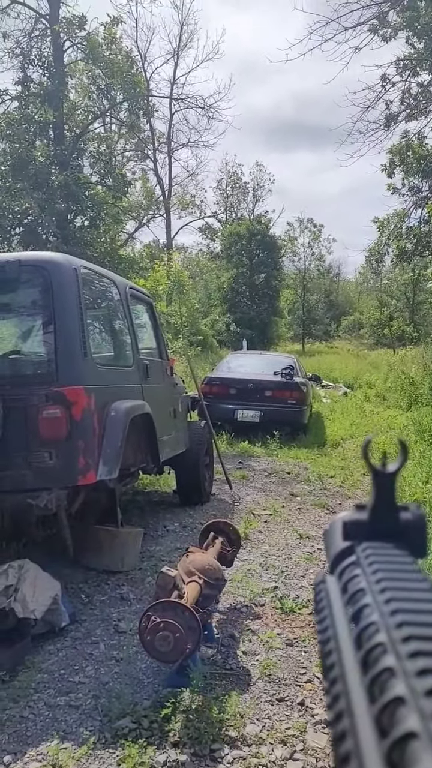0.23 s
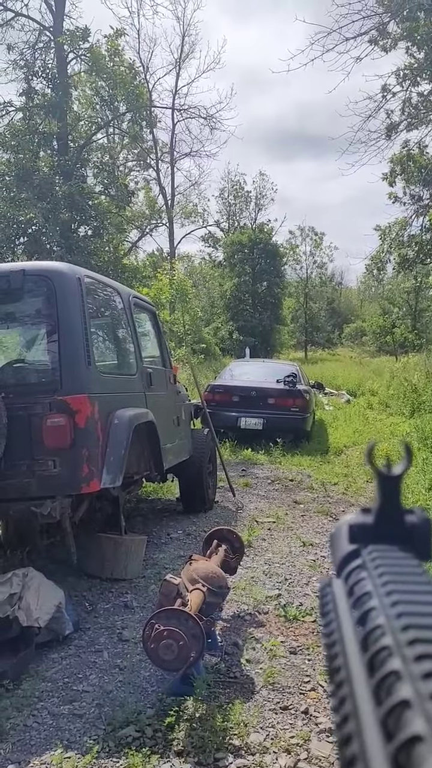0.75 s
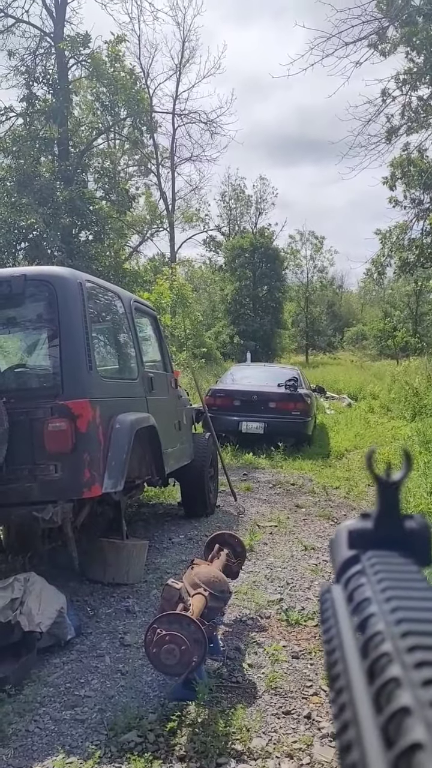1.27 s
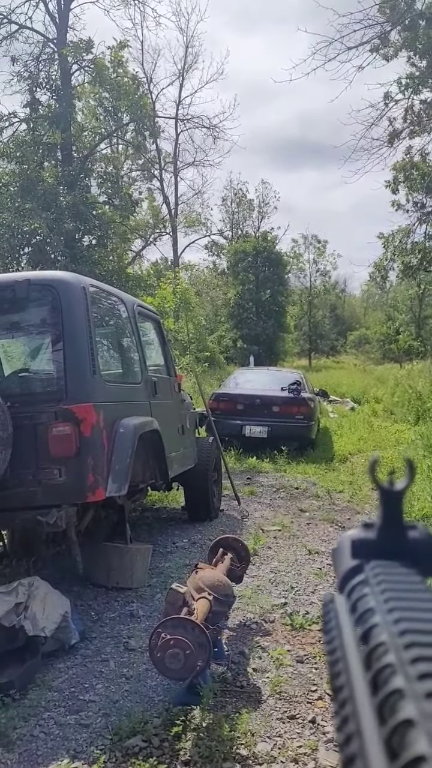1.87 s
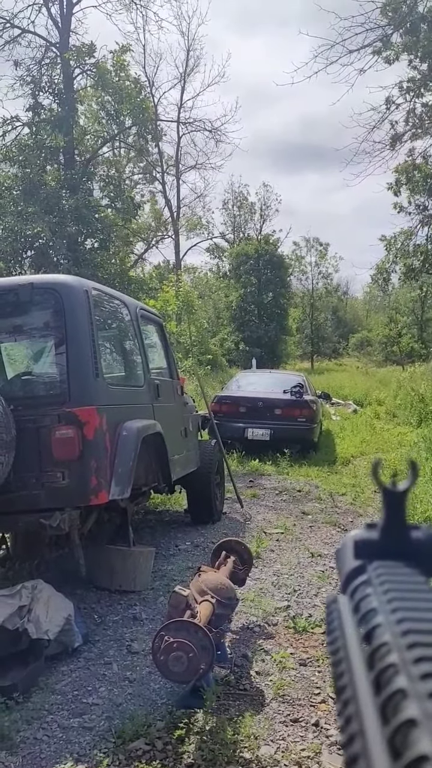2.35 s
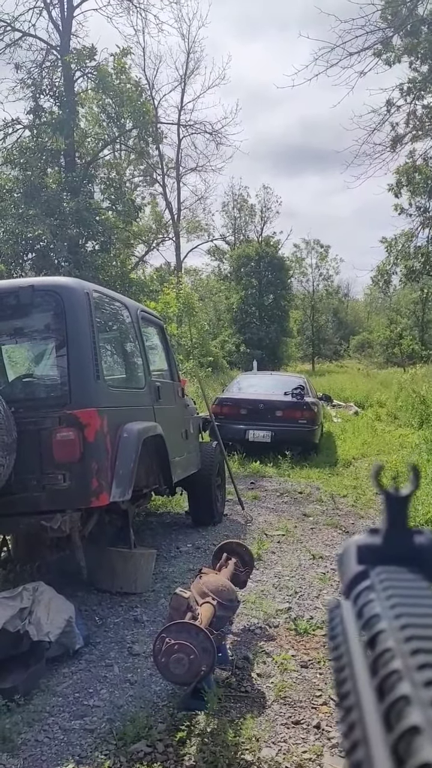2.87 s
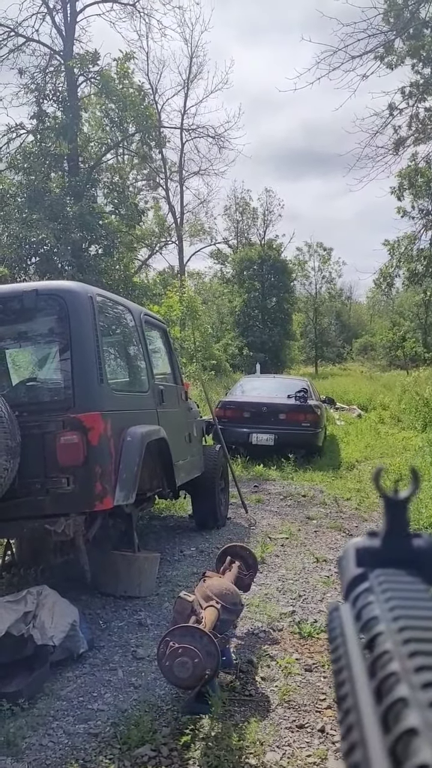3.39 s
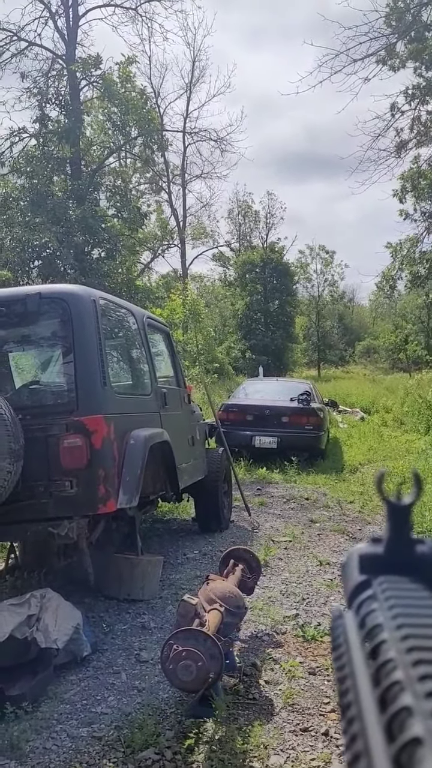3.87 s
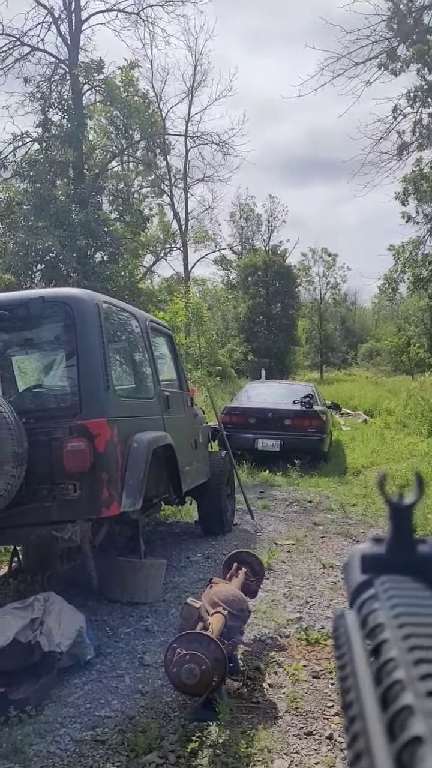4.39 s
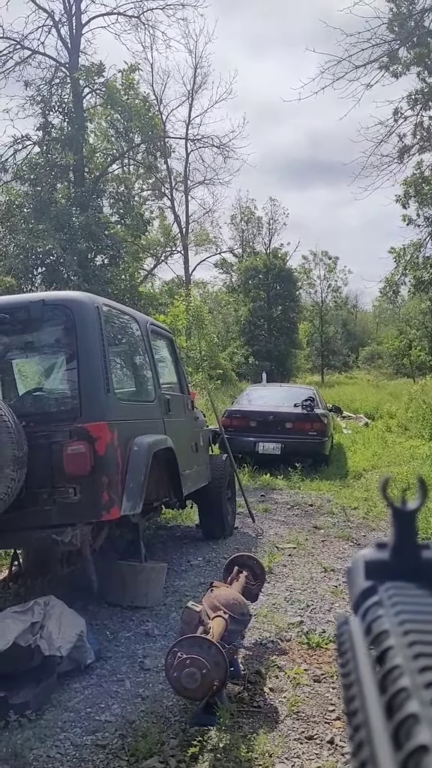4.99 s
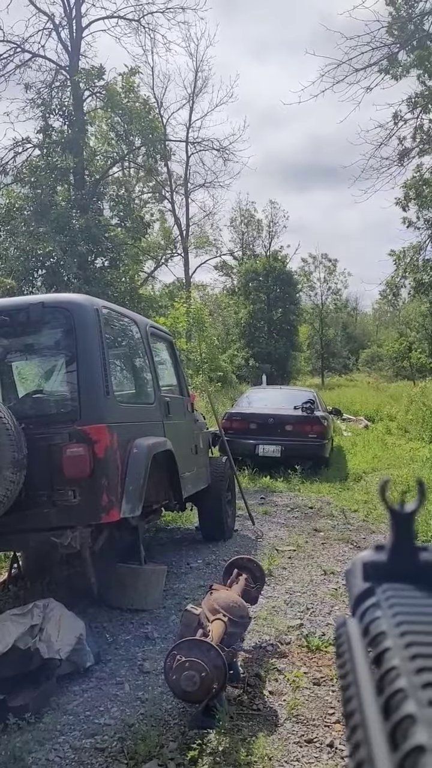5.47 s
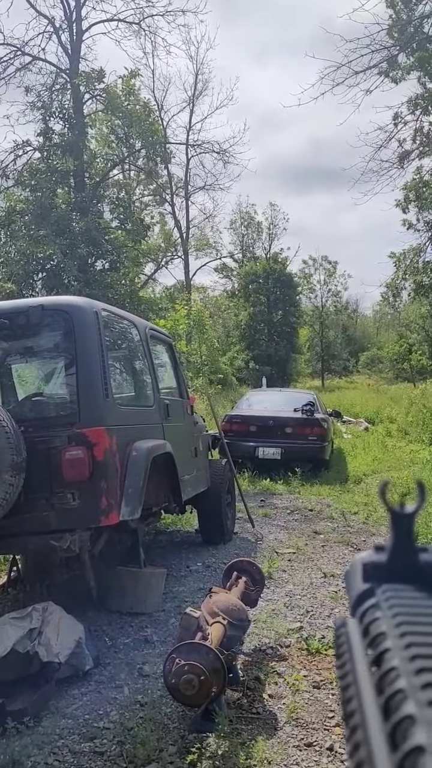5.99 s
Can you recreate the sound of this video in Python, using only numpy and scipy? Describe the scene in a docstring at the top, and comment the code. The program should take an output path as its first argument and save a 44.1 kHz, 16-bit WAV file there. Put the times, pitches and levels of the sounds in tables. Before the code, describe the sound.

An electric airsoft rifle fires single shots, then rapid whirring, rattling bursts close by outdoors, its pellets smacking a distant metal target.

```python
"""An electric airsoft rifle fires bursts in a quiet yard, close in and just right of the microphone.
A motor whines through rattling gears as it cocks the spring; each released piston thumps, pops at the
muzzle and rings the barrel. After some bursts the gears clack back on their latch. Pellets smack a
distant metal target straight ahead and the trees return a thin echo. Underneath lie faint outdoor air
and the low rumble and bumps of a handheld microphone."""
import sys
import numpy as np
from scipy import signal
from scipy.fft import rfft, irfft
from scipy.io import wavfile
from scipy.ndimage import uniform_filter1d

SR = 44100
rng = np.random.default_rng(int(sys.argv[2]) if len(sys.argv) > 2 else 0)


def transcribe(signal):
    """Save signal, clipped to [-1, 1], as a 16-bit WAV file at the path in sys.argv[1]."""
    frames = np.atleast_2d(signal).T
    limited = np.clip(frames, -1, 1)
    pcm = np.round(limited * 32767).astype(np.int16)
    wavfile.write(sys.argv[1], SR, pcm)


N = 275625
TIME = np.arange(N) / SR
PORT_LAG = 15  # samples by which the left microphone port hears the rifle late

# Trigger pulls. Each row: motor on in seconds, top mesh pitch of the first stroke in Hz, motor off and
# standstill in seconds, extra whine on the first stroke in dB, relative gear level in dB.
PULLS = [(.385, 1200, .535, 0.58, 3.5, -23), (1.001, 800, 1.08, 1.155, 0, -24.5),
         (1.159, 950, 1.198, 1.226, 7.5, -24.5), (1.587, 1280, 1.835, 1.88, 6, -23.5),
         (2.508, 1030, 3.165, 3.252, 4, -26), (3.668, 1220, 4.41, 4.443, 6, -29),
         (4.456, 1050, 4.57, 4.64, 5.5, -29), (4.999, 1340, 5.55, 5.605, 6.5, -27),
         (5.556, 1438, 5.715, 5.765, 0.5, -27), (5.797, 1410, 5.962, 6, 4.5, -26.5),
         (6.131, 900, 6.26, 6.35, 0, -27.5)]
# Shots. Each row: time in seconds, relative levels of piston thump and pellet impact in dB.
SHOTS = [(-.112, -26, -29), (.4673, -29.5, -25.5), (1.0389, -24.5, -29), (1.672, -28.5, -27),
         (1.7814, -26, -28), (2.5735, -28, -27), (2.688, -34.5, -32), (2.7994, -33, -31),
         (2.914, -29.5, -38.5), (3.026, -30.5, -30), (3.1341, -32, -29.5), (3.7641, -33.5, -34),
         (3.8833, -37, -32), (3.9983, -33.5, -32), (4.1116, -33, -28.5), (4.2249, -34.5, -29),
         (4.3371, -26.5, -29), (4.5202, -28.5, -27.5), (5.1021, -28.5, -31), (5.2095, -31, -38),
         (5.3187, -28, -28), (5.4295, -34.5, -26.5), (5.5437, -28.5, -33), (5.6773, -28.5, -34),
         (5.8952, -28, -27.5), (6.1865, -31.5, -25)]
# Where the rifle is held; past midway its gearbox comes closer to the right port.
# Each row: time in seconds, left minus right in dB, gain of the gear noise in dB.
AIM = [(0, -4, -1), (4.2, -4.5, -0.5), (4.25, -12, 7.5), (4.6, -12, 4), (6.25, -11.5, 4)]
# Spectrum of a hard blow on the rifle. Each row: frequency in Hz, level in dB.
CLACK = [(100, -14), (400, -1), (900, 4), (2200, 3), (3400, -3), (5000, -1.5), (7000, -6), (9000, -23),
         (12000, -12.5), (16000, -16.5)]


def gearbox(gear_db, rattle_db=-5, shell_db=-7, rasp_db=-5.5, unloaded_db=-6, knocks_per_s=240):
    """Meshing teeth whine and rattle the shell; uneven teeth rasp at multiples of the pinion's turn."""
    # Shell resonances. Each row: frequency in Hz, width in Hz, level in dB.
    shell_modes = [(904, 130, 0), (1958, 130, 1.5), (2474, 45, 4), (2922, 56, 5), (3370, 73, -8),
                   (4330, 110, -4), (4160, 180, -9), (4970, 150, -24.5), (6450, 450, -15.5),
                   (6915, 290, -6.5)]
    # Rattle spectrum. Each row: frequency in Hz, level in dB.
    rattle_colour = [(40, -32), (150, -22), (280, -13), (560, -19), (850, -2), (1150, -4.5), (1500, -2),
                     (2100, -1.5), (3000, -5.5), (4300, -4.5), (7000, -13.5), (8800, -24.5), (12200, -10.5),
                     (16000, -26.5)]
    hz = mesh_pitch() * (1 + .012 * walk(25))  # no two strokes load the motor quite alike
    phase = 2 * np.pi * np.cumsum(hz * (1 + .009 * walk(300))) / SR
    pinion = phase / 10
    contact = (1 + .94 * np.cos(phase)) * (1 + .087 * np.cos(pinion)) * undb(2.4 * walk(650))
    # now and then the slack between the teeth closes with a harder knock
    knocks = (rng.random(N) < knocks_per_s / SR) * undb(14 + 4.6 * rng.standard_normal(N))
    teeth = noise(N, apart=1) * contact + knocks
    # the point of contact wanders, so each resonance swells and fades on its own
    shell = sum(undb(db + 4 * walk(60)) * signal.lfilter(*signal.iirpeak(f, f / width, SR), teeth)
                for f, width, db in shell_modes)
    rasp = sum(undb(5 * walk(70)) * np.sin(k * pinion + walk(100) + rng.uniform(0, np.pi, (2, 1)))
               for k in range(13, 50))
    clatter = undb(rattle_db) * unit(colour(teeth, rattle_colour)) + undb(shell_db) * unit(shell)
    clatter += undb(rasp_db) * unit(colour(rasp, rattle_colour))
    unloaded = sum(during(s - .006, s + .0088) for s, *_ in SHOTS)  # while the piston flies
    # the tone leaves the whole shell, so it reaches the two ports nearly together
    tone = place(whine(hz, phase, gear_db), aim(TIME), lag=PORT_LAG // 2)
    return undb(unloaded_db * unloaded) * (place(clatter * undb(gear_db), aim(TIME)) + tone)


def whine(hz, phase, gear_db, coast_db=-4, second_db=-6, third_db=-4):
    """The mesh tone and two overtones: clearest on the first stroke, weak once the motor coasts."""
    # How well the shell radiates the tone. Each row: frequency in Hz, gain in dB.
    radiation = [(600, -24), (800, -7), (1000, -2), (1300, 0), (1600, 1), (1950, -1), (2200, -6),
                 (3100, -8), (3600, -3), (4000, 0), (4350, 5), (4800, -4), (5300, -14), (6000, -18)]
    db = -6.8 + 1.5 * walk(130) + 1.5 * walk(30)
    db -= 6 * sum(during(s, s + .04) for s, *_ in SHOTS)  # no load until the piston is picked up
    for on, _, off, stop, extra_db, _ in PULLS:
        db += extra_db * during(on, first_release(on, off)) + coast_db * during(off, stop)
    # loose parts make the loudest stretches; there the tone grows by only half as many dB
    db += gear_db - np.maximum(gear_db + 28, 0) / 2
    harmonics = [(1, 0), (2, second_db + 2 * walk(120)), (3, third_db + 2 * walk(120))]
    return np.sqrt(2) * sum(undb(db + own_db + np.interp(k * hz, *np.transpose(radiation)))
                            * np.sin(k * phase) for k, own_db in harmonics)


def mesh_pitch(free_hz=1950, cocked_hz=1300, stall_hz=600, usual_stroke_s=.112):
    """Tooth rate in Hz: the motor spins up, drags as the spring compresses and races on release."""
    # Each row: share of the first stroke, share of its top pitch.
    spin_up = [(0, .45), (.22, .68), (.38, .9), (.56, 1), (.72, .99), (.9, .91)]
    # Each row: share of a later stroke, pitch in Hz at the usual length; a longer stroke runs lower.
    cocking = [(.29, free_hz), (.46, .95 * free_hz), (.69, .83 * free_hz), (.92, cocked_hz)]
    points = []
    for on, top_hz, off, stop, *_ in PULLS:
        shots = shots_in(on, off)
        points = [point for point in points if point[0] < on]  # a new pull cuts a run-down short
        first_stroke = first_release(on, off) - on
        points += [(on + share * first_stroke, speed * top_hz) for share, speed in spin_up]
        for shot, stroke in zip(shots, np.diff(shots)):
            points += [(shot + share * stroke, hz * usual_stroke_s / stroke) for share, hz in cocking]
        if shots and off - shots[-1] > .025:
            points += [(shots[-1] + .022, free_hz), (off, .85 * free_hz)]
        points.append((stop, stall_hz))
    return uniform_filter1d(curve(sorted(points)), size=400)


def gear_level(start_db=-17.5, spin_up_s=.025, firing_db=1.4, shaken_db=3.5, settle_s=.066):
    """Gear noise in dB: it rises with the motor, is shaken up by each shot and dies with the speed."""
    boost_db = firing_db + shaken_db * np.exp(-since_shot() / settle_s)
    gain = 1e-6
    for on, _, off, stop, _, db in PULLS:
        rise_db = start_db * np.clip(1 - (TIME - on) / spin_up_s, 0, 1)
        firing = TIME > min(shots_in(on, off), default=np.inf)
        speed = np.clip((stop - TIME) / (stop - off), .06, 1)
        gain = np.maximum(gain, during(on, stop + .0034) * undb(db + rise_db + firing * boost_db) * speed)
    return 20 * np.log10(gain) + curve([(s, db) for s, _, db in AIM])


def piston(thump_db=13, thump_hz=240, lead_s=.0067, recoil_db=-.5, push_s=.003, rebound_s=.018):
    """The released spring kicks the rifle just before the pop; the stock is pushed back and rebounds."""
    out, t = np.zeros((2, N)), span(.08) - .02
    kick = np.cos(2 * np.pi * thump_hz * t - .6) * bell(t, .0016)
    thump = place(undb(thump_db) * kick, -5.5)
    for s, db, _ in SHOTS:
        rebound = rebound_s + rng.normal(0, .001, (2, 1))
        rock = bell(t, push_s) + bell(t - rebound, push_s)
        recoil = undb(recoil_db + 2.5 * rng.standard_normal((2, 1))) * rock
        add(out, s - lead_s + t[0], undb(db) * (thump + recoil))
    return out


def muzzle(pop_db=1.9, pop_hz=2450, edge_db=-11, bounce_db=-8, bounce_hz=1700, crack_db=-18.5):
    """Air leaves the muzzle as one short, sharp-edged wave; the piston lands and the barrel rings."""
    # Spectrum of the pop's edge. Each row: frequency in Hz, level in dB.
    edge_colour = [(1000, -6.5), (3500, -8.5), (5000, 0), (7000, -5.5), (9000, -15), (11500, -10.5),
                   (16000, -25.5)]
    # Barrel and body modes. Each row: frequency in Hz, level in dB, 60 dB decay time in seconds.
    barrel_modes = [(853, -4.5, 0.042), (1001, -10.5, 0.048), (1366, -6, 0.067), (1820, -9, 0.028),
                    (2150, -10, 0.041), (508.4, -15.5, 0.037), (334, -18.5, 0.051)]
    out, t = np.zeros((2, N)), span(.027)
    from_pop = t - .002
    pop_shape = np.array([bell(from_pop + .00003, .00019), bell(from_pop - .00011, .00034)])  # left, right
    bounce = -np.cos(2 * np.pi * bounce_hz * from_pop) * bell(from_pop, .00054)
    for s, *_ in SHOTS:
        start, db = s + from_pop[0], rng.normal(-1.74, 1.3)
        pop = -np.sin(2 * np.pi * pop_hz * rng.normal(1, .013) * from_pop) * pop_shape
        edge = colour(noise(len(t), apart=.5) * bell(from_pop, .0003), edge_colour)
        add(out, start, undb(db) * (undb(pop_db) * pop + undb(edge_db) * edge))
        add(out, start + rng.normal(.00219, .0001), place(undb(db + bounce_db) * bounce, -16.5))
        crack = colour(noise(len(t), apart=1) * fade(t, .05), CLACK)
        add(out, s + .0014, place(undb(db + crack_db) * crack, -2))
        add(out, s + .0012, place(undb(db - 10) * ring(barrel_modes, t), -6))
    return out


def spring(gear_db, slap_db=-20.2, return_db=-21.2, slap_t60=.04, buzz_db=-8, buzz_t60=.44):
    """After each shot the loose spring slaps its guide twice and buzzes while the gears shake it."""
    # Spectra of slap and buzz. Each row: frequency in Hz, level in dB.
    slap_colour = [(60, -9), (300, -0.5), (550, -6), (1000, -1.5), (2300, -1), (5000, -6.5), (9000, -14.5),
                   (16000, -24)]
    buzz_colour = [(100, -26.5), (350, -6.5), (600, -11), (1400, -3.5), (2600, -3.5), (5000, -1.5),
                   (7000, -3.5), (9000, -8.5), (12000, -4.5), (15000, -9.5)]
    slaps, buzz, t = np.zeros((2, N)), np.zeros((2, N)), span(.12)
    for s, *_ in SHOTS:
        for delay, db in [(.0155, slap_db), (.0305, return_db)]:
            blow = colour(noise(len(t), apart=1) * fade(t, slap_t60), slap_colour)
            add(slaps, s + delay + rng.normal(0, .001), undb(rng.normal(db, .77)) * blow)
        add(buzz, s + .015, colour(noise(len(t), apart=.97) * fade(t, buzz_t60), buzz_colour))
    return place(slaps + undb(gear_db + buzz_db) * buzz, aim(TIME))


def latch(bounce_s=.021, bounce_db=-13, side_db=-3):
    """The spring turns the stopped gears back against the latch, which bounces once."""
    # Each row: start in seconds, level in dB, relative snap near 5 kHz in dB.
    fallbacks = [(.001, -13, -11), (0.584, -7, -6.5), (1.256, -2.5, -6.5), (1.901, -5, -10.5),
                 (4.457, -3.5, -9.5), (4.625, -6, -6.5), (5.792, -5, -11), (6.0188, .5, -4)]
    out = np.zeros((2, N))
    for s, db, snap_db in fallbacks:
        for delay, drop_db in [(0, 0), (bounce_s, bounce_db)]:
            blow = clack(snap_db, treble_db=-16, t60=.03)
            add(out, s + delay, place(undb(db + drop_db) * blow, aim(s) + side_db))
    return out


def trigger(take_up_db=-18, side_db=-3):
    """The gears click as the motor takes up their slack; trigger and stock tick between bursts."""
    # Each row: start in seconds, level in dB, relative treble in dB.
    ticks = [(0.366, -33, -12), (.571, -32.5, -17), (.787, -42.5, -21), (.833, -37.5, 8), (1.464, -41, 1.5),
             (1.516, -39, -27.5), (2.281, -30, -21.5), (2.42, -40, -28), (2.454, -41, -38.5),
             (3.443, -36.5, -19), (3.597, -44.5, -30), (3.627, -38.5, -27), (4.904, -37, -28),
             (4.945, -32.5, -42)]
    out = np.zeros((2, N))
    for on, *_ in PULLS:
        click = clack(snap_db=-15, treble_db=-28, t60=.026)
        add(out, on + .0011, place(undb(take_up_db) * click, aim(on) + side_db))
    for s, db, treble_db in ticks:
        tick = clack(snap_db=-8, treble_db=treble_db, t60=.024)
        add(out, s, place(undb(db) * tick, aim(s) + side_db))
    return out


def clack(snap_db, treble_db, t60, crack_db=-7, modes_db=-15, tail_db=-27, rise_s=.0013):
    """One blow on the receiver: a gritty crack, brighter for a harder contact, and a short ring."""
    # Each row: frequency in Hz, level in dB, 60 dB decay time in seconds.
    receiver_modes = [(843, -6.5, 0.045), (1450, -4, 0.055), (2500, -9, 0.024), (4135, -0.5, 0.048),
                      (4600, -5, 0.037), (5100, -10, 0.037), (7000, -8.5, .035)]
    t = span(.064)
    shape = (1 - np.exp(-t / rise_s)) * (fade(t, t60) + undb(tail_db) * fade(t, .09))
    lift_db = [0, snap_db + 14.5, snap_db + 4.5, .77 * (treble_db + 22.5)]
    spectrum = [(hz, db + np.interp(hz, [3000, 4530, 6140, 9300], lift_db)) for hz, db in CLACK]
    crack = colour(noise(len(t), apart=1) * shape, spectrum)
    return undb(crack_db) * crack + undb(modes_db) * ring(receiver_modes, t)


def pellets(delay_s=.1265, smack_db=9, scatter_db=-17, ring_db=-32, ring_hz=3320):
    """Pellets smack a far metal target, which rings faintly; the crack scatters off gravel and leaves."""
    # Impact spectrum. Each row: frequency in Hz, level in dB.
    smack_colour = [(300, -12.5), (1000, -11.5), (3000, -5.5), (6000, -6.5), (9000, -8.5), (12000, -2),
                    (16000, -4.5)]
    out, t = np.zeros((2, N)), span(.5)
    for s, _, db in SHOTS:
        smack = noise(len(t), apart=.47) * fade(t, .024)
        scatter = undb(scatter_db) * noise(len(t), apart=.48) * fade(t, .27)
        plate = unit(signal.lfilter(*signal.iirpeak(ring_hz, 12, SR), noise(len(t), apart=2)))
        impact = colour(smack + scatter, smack_colour) + undb(ring_db) * plate * fade(t, .42)
        add(out, s + delay_s, undb(db + smack_db) * impact)
    return out


def trees(x, echo_db=-26, t60=.46):
    """A weak diffuse echo comes back from the tree line and the vehicles."""
    # Echo spectrum. Each row: frequency in Hz, level in dB.
    echo_colour = [(100, -9.5), (700, 7), (2000, 1), (4000, 0), (8000, 6), (12000, -1), (16000, 0)]
    t = span(1)
    tail = colour(rng.standard_normal((2, len(t))) * fade(t, t60) * (1 - np.exp(-t / .0015)), echo_colour)
    tail /= np.linalg.norm(tail, axis=1, keepdims=True)
    return undb(echo_db) * signal.fftconvolve(x.mean(0)[None], tail, axes=-1)[:, :N]


def bumps(hz=70, t60=.027):
    """A hand nudges the microphone: a couple of low cycles."""
    # Each row: start in seconds, level in dB.
    nudges = [(1.41, -42), (1.54, -35), (1.938, -33.5), (4.678, -38), (4.745, -37.5), (5.106, -14)]
    out, t = np.zeros((2, N)), span(.15)
    for s, db in nudges:
        add(out, s, undb(db) * np.sin(2 * np.pi * hz * t) * fade(t, t60))
    return out


def hands(rest_db=-78, shaken_db=-53, t60=.9, uneven_db=3):
    """Soft handling rumble: the hands tremble after each recoil and then settle."""
    rumble = signal.sosfilt(signal.butter(2, [35, 130], "band", fs=SR, output="sos"), noise(N, apart=1.2))
    recoil = (TIME > SHOTS[1][0]) * fade(since_shot(), t60)
    return (undb(rest_db) + undb(shaken_db) * recoil) * undb(uneven_db * walk(10)) * unit(rumble)


def air(level_db=-66.5):
    """Faint outdoor air all around the microphone."""
    # Each row: frequency in Hz, level in dB.
    air_colour = [(20, -30), (50, -14.5), (170, -13.5), (400, -12), (650, -16.5), (950, -11), (1300, -20),
                  (3500, -27.5), (7000, -31), (9000, -37), (16000, -34)]
    return undb(level_db + .46 * walk(.92)) * unit(colour(noise(N, apart=.69), air_colour))


def place(x, pan_db, treble_share=.56, lag=PORT_LAG):
    """The left port hears the rifle later and weaker; the top octave is panned less."""
    x = np.broadcast_to(x, (2, x.shape[-1]))
    body = signal.sosfiltfilt(signal.butter(3, 7500, fs=SR, output="sos"), x)
    out = 0
    for (left, right), ratio in [(body, undb(pan_db)), (x - body, undb(treble_share * pan_db))]:
        late_left = np.pad(left, (lag, 0))[:len(left)]
        out = out + np.array([late_left * ratio, right]) * np.sqrt(2 / (1 + ratio ** 2))
    return out


def aim(s):
    """The rifle's pan at time s, left minus right in dB."""
    times, pan_db, _ = np.transpose(AIM)
    return np.interp(s, times, pan_db)


def shots_in(on, off):
    """Times of the shots of one trigger pull."""
    return [s for s, *_ in SHOTS if on < s < off]


def first_release(on, off):
    """End of the first stroke of a trigger pull."""
    return min(shots_in(on, off) + [off])


def since_shot():
    """Seconds since the latest shot."""
    times = np.array([s for s, *_ in SHOTS])
    return TIME - times[np.searchsorted(times, TIME) - 1]


def ring(modes, t):
    """Struck modes (Hz, dB, t60), slightly different at every blow."""
    return sum(undb(rng.normal(db, .6)) * np.sin(2 * np.pi * hz * rng.normal(1, .0056) * t) * fade(t, t60)
               for hz, db, t60 in modes)


def colour(x, points, size=2048):
    """Minimum-phase filter of unit energy, shaped by (Hz, dB) points."""
    hz, db = np.transpose(points)
    bin_hz = np.arange(size // 2 + 1) * SR / size
    log_gain = np.log(undb(np.interp(np.log(bin_hz + 1), np.log(hz), db)))
    cepstrum = irfft(log_gain)[:size // 2]
    cepstrum[1:] *= 2
    response = irfft(np.exp(rfft(cepstrum, size)))
    response /= np.linalg.norm(response)
    return signal.fftconvolve(np.atleast_2d(x), response[None], axes=-1)[:, :x.shape[-1]]


def noise(size, apart):
    """Noise at the two ports, partly shared."""
    return unit(rng.standard_normal(size) + apart * rng.standard_normal((2, size)))


def walk(rate):
    """Random drift of rms 1, with `rate` turns a second."""
    step = max(int(SR / rate), 1)
    return unit(uniform_filter1d(np.repeat(rng.standard_normal(N // step + 1), step), step)[:N])


def during(start, end):
    """Smooth gate, 1 between two times."""
    return uniform_filter1d(1. * ((TIME > start) & (TIME < end)), size=100)


def fade(t, t60):
    """Decay by 60 dB in t60 seconds."""
    return np.exp(-np.log(1000) * t / t60)


def bell(t, width_s):
    """Gaussian pulse around t = 0."""
    return np.exp(-(t / width_s) ** 2)


def curve(rows):
    """Join (seconds, value) rows by straight lines."""
    return np.interp(TIME, *np.transpose(rows))


def span(seconds):
    """Time axis of a short sound."""
    return np.arange(int(seconds * SR)) / SR


def undb(db):
    """Decibels to gain."""
    return 10 ** (np.asarray(db) / 20)


def unit(x):
    """Scale to rms 1."""
    return x / np.sqrt(np.mean(x ** 2))


def add(out, s, sound):
    """Mix a sound in at time s, if that lies within the scene."""
    i = int(round(s * SR))
    if 0 <= i < N:
        out[:, i:i + sound.shape[-1]] += sound[..., :N - i]


def scene():
    """The close rifle and far target with their echo, over the quiet yard and handling noise."""
    gear_db = gear_level()
    direct = gearbox(gear_db) + piston() + muzzle() + spring(gear_db) + latch() + trigger() + pellets()
    return direct + trees(direct) + air() + hands() + bumps()


def record(dry):
    """The recorder thins the deep bass, rounds the tallest peaks and cuts the top."""
    thinned = signal.sosfilt(signal.butter(2, 45, "high", fs=SR, output="sos"), dry)
    rounded = thinned / (1 + (thinned / .84) ** 4) ** .25
    return signal.sosfilt(signal.ellip(8, .2, 70, 15700, fs=SR, output="sos"), rounded)


dry = scene()
out = record(dry)
transcribe(out)
```